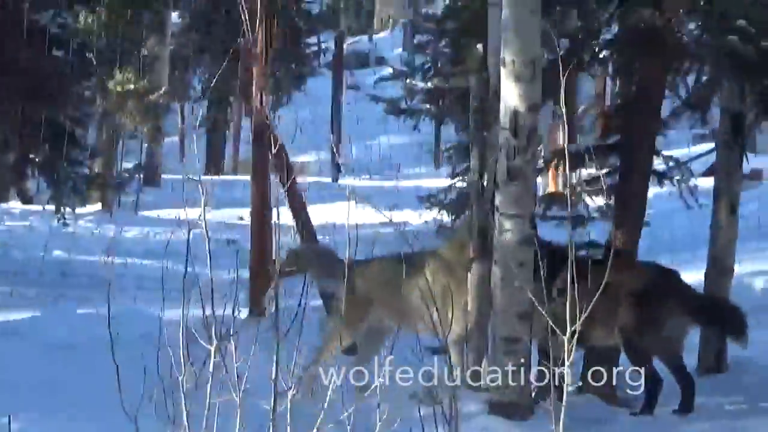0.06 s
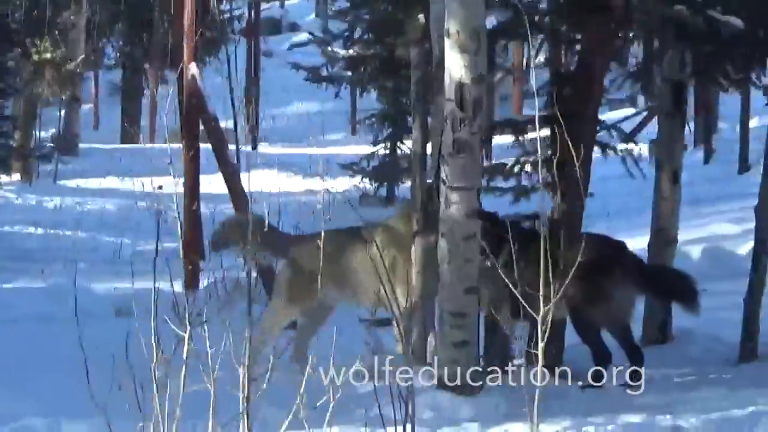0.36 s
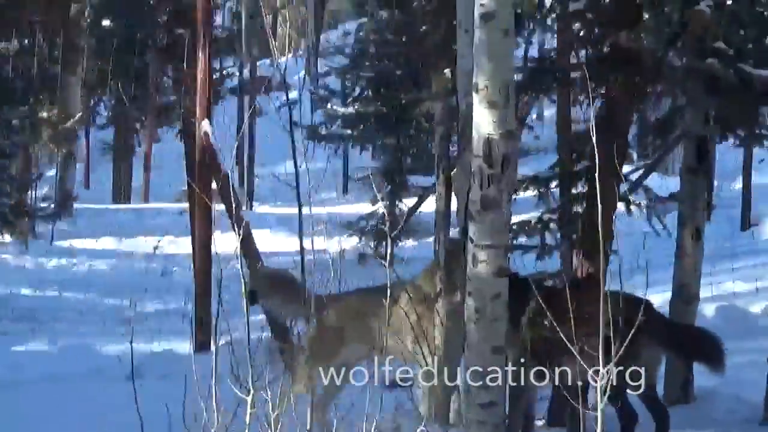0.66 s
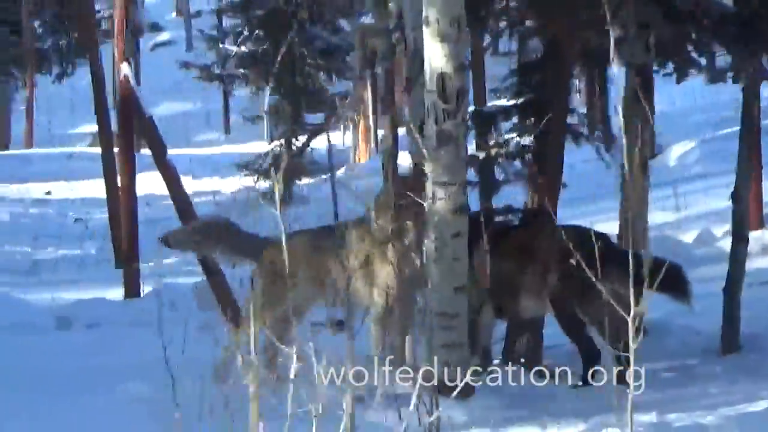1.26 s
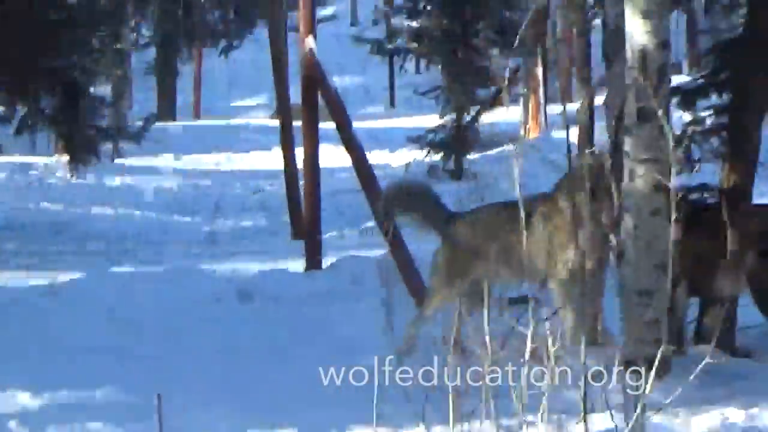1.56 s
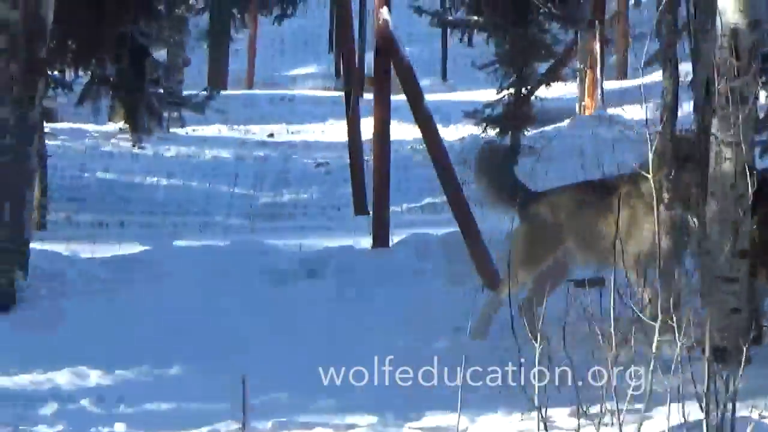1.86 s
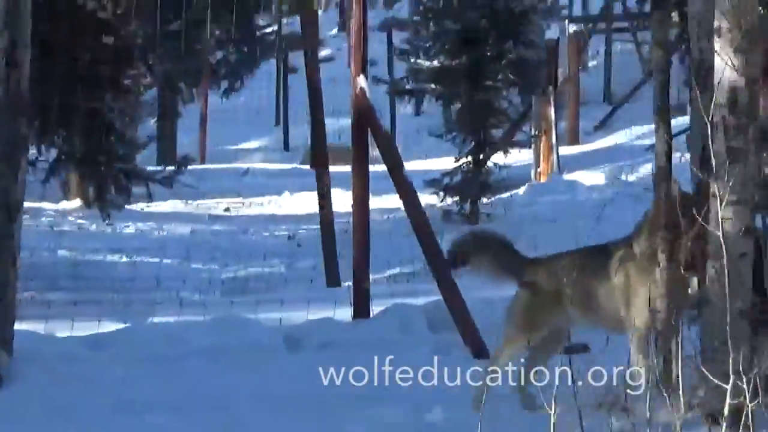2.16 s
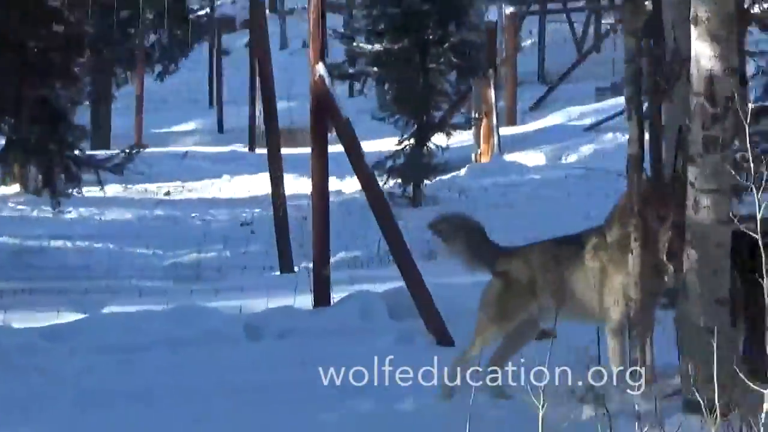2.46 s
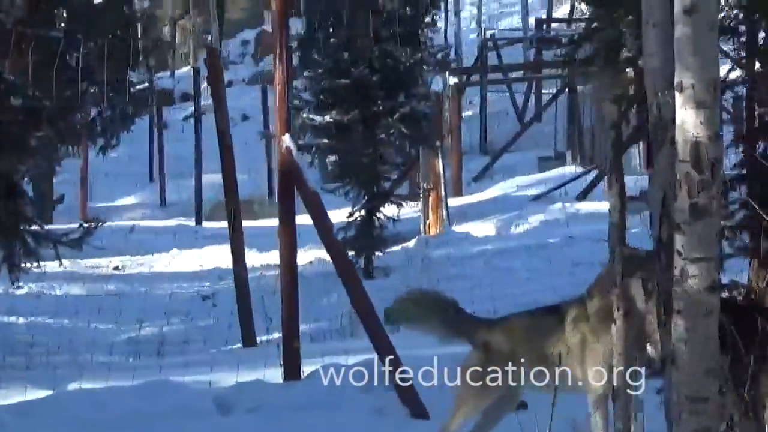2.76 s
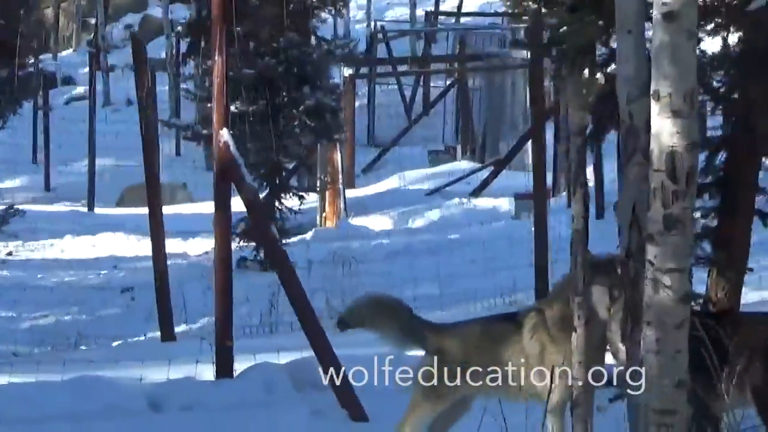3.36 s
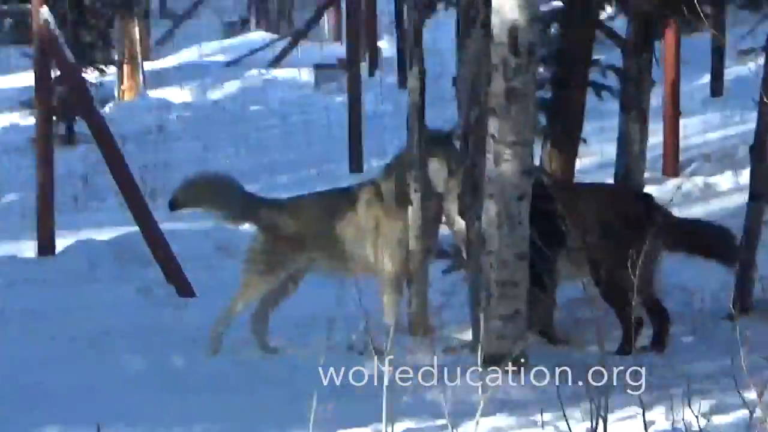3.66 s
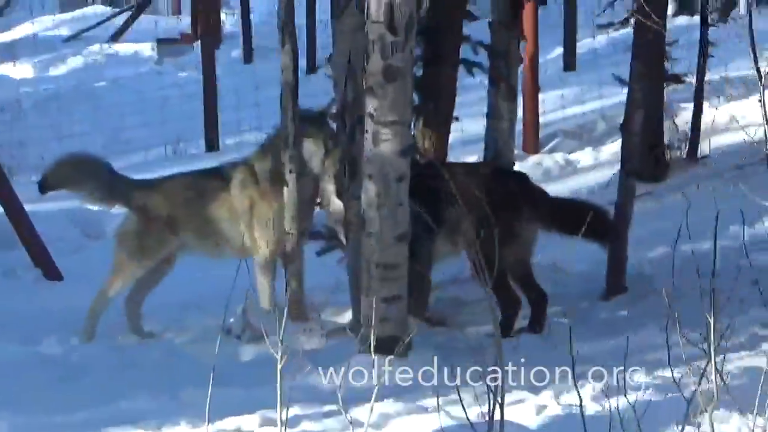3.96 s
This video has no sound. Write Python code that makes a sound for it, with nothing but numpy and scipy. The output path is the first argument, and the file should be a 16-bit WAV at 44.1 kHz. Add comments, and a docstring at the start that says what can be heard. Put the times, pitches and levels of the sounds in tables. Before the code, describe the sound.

Boots press slowly into cold snow, each close step creaking into a crunch with a small squeak. Trouser legs swish and soles scuff in between, over a faint woodland rustle, while low bumps on the microphone build late on.

```python
"""Slow steps on cold snow

A quiet wood, the microphone close to the walker's boots. Each boot loads the dry snow in single
creaking slips that crowd into a crunch and end in a squeak; now and then the icy crust snaps.
Between steps the legs swish past and the soles scuff; a low rumble grows on the microphone."""
import sys
import numpy as np
from scipy.fft import rfft, irfft, next_fast_len
from scipy.io import wavfile
from scipy.ndimage import map_coordinates

SR = 44100
rng = np.random.default_rng(int(sys.argv[2]) if len(sys.argv) > 2 else 0)


def unload_wav(signal):
    """Save mono or channel-first audio to the path in sys.argv[1] as 16-bit WAV at rate SR, clipped to [-1, 1]."""
    wavfile.write(
        sys.argv[1],
        SR,
        np.round(np.clip(np.atleast_2d(signal).T, -1, 1) * 32767).astype(np.int16),
    )


N = 176400

# faint rustle of the wood, all around (frequency [Hz], gain [dB])
RUSTLE_COLOUR = [(25, -19), (90, -56), (250, 5.5), (650, 1.5), (1300, -3), (2000, -6.5), (3800, -8),
                 (5800, -8), (7700, -12.5), (10000, -6.5), (11000, -8.5)]
# the walker holds still and the background drops (start [s], end [s])
PAUSES = [(0.196, 0.28), (1.825, 1.905)]
# buffeting on the microphone (time [s], level [dB])
RUMBLE_LEVELS = [(0, -55.5), (.5, -53), (.7, -43.5), (.83, -37), (.9, -62), (1.401, -65), (2.08, -66),
                 (2.18, -51), (2.621, -60), (2.92, -39), (3.301, -47), (3.55, -29.5), (3.75, -39.5),
                 (4, -34)]
# its spectrum (frequency [Hz], gain [dB])
RUMBLE_COLOUR = [(20, -22), (50, 2), (100, -3), (150, -4.5), (230, -12), (400, -23), (1500, -41)]
# how hard the snow crunches, one list a step (time [s], relative level [dB], grain pitch [Hz])
STEP_CRUNCHES = [
    [(0.0, -38.5, 1070), (0.138, -33, 950), (0.16, -40.5, 860)],
    [(0.735, -26.5, 1200), (0.809, -23, 990), (0.85, -53, 788)],
    [(1.27, -46, 770), (1.468, -30.5, 1440), (1.51, -52, 720)],
    [(1.975, -47.5, 780), (2.157, -22.5, 1240), (2.205, -35.5, 750)],
    [(2.68, -66, 809), (2.796, -27.5, 1070), (2.89, -39.5, 694)],
    [(3.32, -43, 1080), (3.416, -24, 1440), (3.6, -38.5, 647)],
]
# how the snow pack colours its breaking grains (frequency [Hz], gain [dB])
SNOW_PACK_COLOUR = [(80, -53), (170, -0.5), (280, -0.5), (600, 3.5), (900, 1), (1400, 0.5), (2000, 3.5),
                    (2700, 1.5), (3800, -3), (8000, -26)]
# fine fizz on top of a crunch (frequency [Hz], gain [dB])
FIZZ_COLOUR = [(1500, -21), (2600, 5), (4000, 5.5), (5500, 4.5), (6600, 5), (7800, -2), (9400, 5.5),
               (11000, 4.5)]
# single slips of snow under the sole (time [s], relative level [dB], pitch [Hz], width [ms])
SNOW_SLIPS = [(0.0217, -27, 880, 1.6), (0.0382, -22, 1160, 2.1), (0.0728, -25, 860, 2.3),
              (0.2597, -28.0, 650, 4.3), (0.363, -26.5, 740, 6), (0.5881, -26.0, 760, 3.5),
              (0.7431, -12.5, 840, 0.86), (0.7752, -18, 710, 2.3), (0.8125, -18, 640, 2.7),
              (0.8349, -18, 1420, 0.65), (0.8647, -24.5, 1213, 0.82), (1.1109, -16, 690, 0.54),
              (1.2052, -19, 584, 1), (1.247, -22.5, 790, 0.53), (1.2588, -17, 920, 0.6),
              (1.2649, -21.5, 1030, 1.4), (1.283, -25.5, 660, 1.6), (1.324, -26, 890, 1.0),
              (1.331, -19.5, 1080, 0.82), (1.4623, -20, 684, 2.1), (1.4936, -21, 630, 1),
              (1.51, -24.0, 570, 2), (1.5318, -18.5, 670, 1.2), (1.5559, -20.5, 660, 1.1),
              (1.565, -21.5, 695, 3.1), (1.5756, -16.5, 580, 2.5), (1.6003, -17.5, 670, 2.6),
              (1.6079, -19, 770, 2), (1.6293, -16, 780, 0.89), (1.6526, -21.5, 845, 3.2),
              (1.7981, -19.5, 720, 1.35), (1.9132, -16.0, 1070, 0.85), (1.9826, -19.5, 795, 3.3),
              (1.9871, -16, 720, 2.8), (2.0076, -18.0, 850, 1.4), (2.0345, -15.5, 1220, 1.4),
              (2.0641, -18.5, 870, 3.4), (2.1332, -12.5, 742, 1.1), (2.1416, -23, 844, 2.3),
              (2.1914, -14, 656, 3.9), (2.2273, -19, 850, 1.0), (2.4299, -31.5, 620, 2.1),
              (2.47, -29, 840, 2.3), (2.5154, -23, 860, 1.4), (2.5637, -14.5, 690, 1.76),
              (2.6045, -14.5, 684, 1.15), (2.634, -14, 676, 0.81), (2.6573, -19, 1030, 1.0),
              (2.6675, -12.5, 730, 0.62), (2.6904, -17, 808, 1), (2.704, -17, 910, 0.4),
              (2.7156, -17.5, 720, 1.9), (2.7368, -25.5, 1180, 7.3), (2.7467, -20.5, 840, 2.0),
              (2.7574, -14.5, 1100, 0.55), (2.7639, -15, 1000, 0.85), (2.821, -18.5, 670, 3.2),
              (2.8665, -24.5, 677, 4.9), (2.8797, -18.5, 700, 2.2), (2.9017, -18.5, 720, 2.1),
              (2.936, -16.5, 673, 1.76), (3.076, -20, 802, 1.13), (3.1218, -18.5, 775, 3.3),
              (3.2225, -21, 970, 1.8), (3.2695, -24.5, 920, 1.3), (3.2864, -15.5, 970, 1.5),
              (3.3132, -24, 1000, 2), (3.3316, -20.5, 980, 1.9), (3.342, -23.0, 1205, 3),
              (3.3536, -11, 1250, 0.8), (3.3642, -20.0, 1167, 3.8), (3.4683, -11.5, 1350, 1.3),
              (3.5125, -11.0, 645, 1.7), (3.5602, -20.5, 600, 2.8), (3.581, -21, 610, 2.2),
              (3.5893, -17.5, 630, 2), (3.6347, -19, 632, 3.2), (3.6808, -16, 610, 3.1),
              (3.7371, -22, 790, 1.9), (3.7734, -16.5, 597, 2.9), (3.8272, -15, 715, 2.6),
              (3.8607, -19.5, 810, 1.4), (3.9079, -17, 810, 3.2), (3.9913, -14.5, 690, 3.6)]
# puff of hiss around a slip (frequency [Hz], gain [dB])
PUFF_COLOUR = [(120, 1), (300, 19), (1200, 16), (2200, 0.5), (3800, -2.5), (6000, -0.5), (7800, -7),
               (10500, -1.5)]
# slips locking into a squeak (start [s], length [s], start pitch [Hz], end pitch [Hz], level [dB])
SNOW_SQUEAKS = [(0.075, 0.038, 2000, 2350, -34), (0.919, .14, 1849, 2350, -47),
                (1.418, 0.046, 1500, 2042, -27), (2.089, .035, 1754, 1500, -24),
                (2.157, 0.044, 1200, 1112, -23), (2.29, .13, 1300, 1833, -48.5),
                (2.763, 0.079, 1450, 2092, -30), (3.376, 0.084, 1350, 1706, -24.5)]
# legs passing each other
# (start [s], length [s], level [dB], zip relative to hiss [dB], start pitch [Hz], end pitch [Hz])
LEG_SWISHES = [(.25, 0.11, -38.5, -10, 2026, 3500), (0.371, 0.11, -29.5, -9.5, 4700, 6660),
               (0.852, 0.22, -39, -25, 4000, 6070), (1.704, 0.086, -38, -7.5, 3800, 6200),
               (2.267, 0.24, -40, -20, 4420, 5800), (2.988, 0.075, -33.5, -8, 3700, 6200),
               (3.062, 0.11, -34, -13.5, 4530, 6500), (3.726, 0.14, -38, -18, 5380, 6500),
               (3.82, 0.15, -38.5, -17, 5130, 5600)]
# hiss of cloth on cloth (frequency [Hz], gain [dB])
CLOTH_COLOUR = [(100, -0.5), (250, -1.5), (600, -3.5), (900, 2.5), (1300, -8.5), (2000, -6.5), (3000, -4.5),
                (4200, -5.5), (5600, -3), (7700, -7.5), (9400, 0), (11000, -1.5)]
# short skids of the sole (start [s], length [s], level [dB])
SOLE_SCUFFS = [(0.506, 0.02, -34), (0.546, 0.022, -35.5), (0.584, .021, -32.5), (0.626, 0.025, -33),
               (0.658, .023, -32), (0.69, 0.1, -34.5), (1.114, 0.028, -42.5), (1.648, 0.025, -36.5),
               (1.799, 0.0091, -30), (1.916, 0.01, -35), (3.222, 0.0076, -31), (3.288, 0.0079, -29),
               (3.855, 0.0097, -34.5)]
# their rubbing noise (frequency [Hz], gain [dB])
SCUFF_COLOUR = [(80, -16), (200, 9.5), (700, 3), (1200, -1), (2500, -4), (4000, -5.5), (5800, -2.5),
                (7800, -10.5), (9500, -1.5), (11000, -4.5)]
# a boot taking weight (time [s], half length [s], level [dB], pitch [Hz])
BOOT_THUDS = [(0.59, 0.0074, -32, 212), (0.727, 0.022, -31.5, 222.3), (1.444, 0.17, -40.5, 290)]
# low knocks on the microphone (time [s], peak level [dB])
MIC_BUMPS = [(0.666, -33), (2.282, -43), (2.352, -43.5), (2.925, -30), (3.11, -33), (3.279, -29.5),
             (3.426, -27), (3.543, -21), (3.567, -25), (3.597, -29), (3.663, -26.5), (3.726, -22),
             (3.919, -23)]
# the icy crust snapping (time [s], level [dB])
CRUST_CRACKS = [(0.7405, -12), (0.8357, -26), (1.1094, -19), (1.203, -23.5), (1.266, -18), (2.8204, -18.5),
                (2.88, -24), (3.2023, -23), (3.228, -21.5), (3.269, -25), (3.4679, -14), (3.5129, -15.5)]
# spectrum of a snap (frequency [Hz], gain [dB])
CRUST_COLOUR = [(150, -8), (300, -24), (1200, -7), (2200, 14), (3800, -6), (5600, -1), (7800, -9),
                (10500, -6)]
# stereo width of the walker at the microphone (frequency [Hz], side gain [dB])
STEREO_WIDTH = [(100, -36), (500, -17.5), (1000, -16), (2000, -12.5), (4000, -11.5), (10000, -16)]


def amp(db):
    """Decibels to gain."""
    return 10 ** (np.asarray(db) / 20)


def unit(x):
    """Scaled to rms 1."""
    return x / np.sqrt(np.mean(x ** 2) + 1e-20)


def clock():
    """Time of each sample."""
    return np.arange(N) / SR


def filtered(x, gain):
    """x times a gain that depends on frequency."""
    size = next_fast_len(N + 8192)
    return irfft(rfft(x, size) * gain(np.fft.rfftfreq(size, 1 / SR)), size)[..., :N]


def coloured(x, points):
    """x shaped by (frequency [Hz], gain [dB]) points on a log axis."""
    knots_hz, db = np.transpose(points)
    return filtered(x, lambda hz: amp(np.interp(np.log(hz + 1), np.log(knots_hz + 1), db)))


def noise(points):
    """Coloured noise of rms 1."""
    return unit(coloured(rng.standard_normal(N), points))


def wobble(rate):
    """A smooth random curve, rate knots a second."""
    return map_coordinates(rng.standard_normal(N // 8), [clock() * rate], mode='wrap')


def fuzzy_tone(hz, width_hz):
    """A band of noise that follows a pitch curve."""
    phase = 2 * np.pi * np.cumsum(hz) / SR
    return unit(wobble(width_hz) * np.sin(phase) + wobble(width_hz) * np.cos(phase))


def gate(start, end, edge_s):
    """1 between start and end, with soft edges."""
    t = clock()
    return np.clip(np.minimum(t - start, end - t) / edge_s + .5, 0, 1)


def grains(per_s, pitch_hz, spread_db, scatter_octaves=0.79, decay_cycles=0.61):
    """Tiny fractures at random moments, each about one cycle long, coloured by the snow pack; rms 1."""
    count = int(per_s * N / SR)
    moment, strength, phase = rng.random((8000, 4))[:count, :3].T
    detune = np.clip(rng.standard_normal(8000)[:count], -2, 2)
    at = (moment * N).astype(int)
    hz = np.broadcast_to(pitch_hz, N)[at] * 2 ** (scatter_octaves * detune)
    offsets = np.arange(-128, 256)
    cycles = hz[:, None] * offsets / SR
    size = amp(-spread_db * np.log(1 - .95 * strength))  # many weak, few strong
    envelope = np.exp(-np.abs(cycles / (decay_cycles * np.where(offsets < 0, .5, 1))) ** 1.01)
    waves = size[:, None] * envelope * np.cos(2 * np.pi * (cycles + phase[:, None]))
    fractures = np.bincount(((at[:, None] + offsets) % N).ravel(), waves.ravel(), N)
    return unit(coloured(fractures, SNOW_PACK_COLOUR))


def wood_rustle():
    """The faint, wide background of the wood."""
    mid, side = noise(RUSTLE_COLOUR), amp(-9) * noise(RUSTLE_COLOUR)
    return amp(-46.5) * np.array([mid + side, mid - side])


def settling_snow():
    """Snow ticks softly under the standing foot."""
    return amp(-46) * grains(per_s=500, pitch_hz=1156, spread_db=4)


def mic_rumble():
    """Lumpy low buffeting on the microphone, partly different on each side."""
    times, db = np.transpose(RUMBLE_LEVELS)
    mid, side = [unit(amp(2.7 * wobble(27.75)) * noise(RUMBLE_COLOUR)) for _ in range(2)]
    side = coloured(side, [(30, -16), (70, -10), (130, -6)])
    return amp(np.interp(clock(), times, db)) * np.array([mid + side, mid - side])


def sole_chatter(load, rate_hz=134.8, jitter=.25, depth_db=4):
    """A lightly loaded sole sticks and slips in quick pulses; under full weight they merge."""
    phase = 2 * np.pi * np.cumsum(rate_hz * np.exp(jitter * wobble(rate_hz))) / SR
    depth = np.log(amp(depth_db)) / (1 + (load / amp(-26)) ** 2)
    return np.exp(depth * np.cos(phase)) / np.sqrt(np.i0(2 * depth))  # a gain of mean power 1


def snow_crunch():
    """Under full weight the snow breaks in dense grains, topped by crisper ones and a fine fizz."""
    t, load, pitch = clock(), np.zeros(N), np.full(N, 1156.)
    for step in STEP_CRUNCHES:
        times, db, hz = np.transpose(step)
        pressing = gate(times[0], times[-1], edge_s=0.0015)
        load += pressing * amp(np.interp(t, times, db))
        pitch = np.where(pressing > 0, np.interp(t, times, hz), pitch)
    fizz = (load / amp(-28.5)) ** 0.55 * amp(-35 + 2.85 * wobble(250)) * noise(FIZZ_COLOUR)
    crisp = (load / amp(-17.5)) ** 0.12 * amp(-36.5) * grains(per_s=450, pitch_hz=1900, spread_db=0.5)
    dense = load * amp(-0.5) * grains(per_s=1300, pitch_hz=pitch, spread_db=3)
    return sole_chatter(load) * (dense + crisp) + fizz


def snow_creaks(sag=0.19, snap_hz=2023, snap_s=0.00038, give_hz=302, give_s=0.006):
    """Each slip is a few cycles of sagging pitch, with a bright snap, a low give and a puff of hiss."""
    t, slips, puff_level = clock(), np.zeros(N), np.zeros(N)
    for at, db, hz, width_ms in SNOW_SLIPS:
        near = slice(max(0, int((at - .012) * SR)), int((at + .02) * SR))
        age, width, brightness = t[near] - at, width_ms / 1000, hz / 900
        # the bright edge comes just ahead of the slip's peak
        snap_level = amp(-7) * min(brightness, 1) ** 2 * np.exp(-((age + 0.47 * width) / snap_s) ** 2)
        snap_cycles = snap_hz * age * np.exp(rng.normal(0, 0.19)) + rng.random()
        snap = snap_level * np.sin(2 * np.pi * snap_cycles)
        # the pack gives way afterwards; hard slips push it little further
        after = np.maximum(age, 0)
        give_level = amp(-11.5) / max(width_ms, 1) / (1 + amp(db + 15.5))
        give_cycles = give_hz * after * np.exp(rng.normal(0, 0.093))
        give = give_level * np.exp(-after / give_s) * np.sin(2 * np.pi * give_cycles)
        flank_s = width * np.where(age < 0, 0.42, 0.9)  # quick rise, slower fall
        cycles = hz * (age - sag * width * np.log(np.cosh(age / width)))
        body = np.exp(-(age / flank_s) ** 2) * np.cos(2 * np.pi * cycles + rng.normal(0, 0.48))
        slips[near] += amp(db - 0.5) * (give - body - snap)
        puff_level[near] += amp(db - 10) * brightness ** 0.56 * np.exp(-np.abs(age) / (1.44 * width))
    return slips + puff_level * noise(PUFF_COLOUR)


def snow_squeaks():
    """Slips fall into step for a moment and make a rough gliding tone."""
    t, level, pitch = clock(), np.zeros(N), np.zeros(N)
    for start, length, start_hz, end_hz, db in SNOW_SQUEAKS:
        progress = np.clip((t - start) / length, 0, 1)
        level += amp(db) * np.sqrt(np.abs(np.sin(np.pi * progress)))
        pitch = np.where(t >= start, start_hz + (end_hz - start_hz) * progress, pitch)
    return level * unit(fuzzy_tone(pitch, width_hz=380) + fuzzy_tone(pitch, width_hz=1300))


def leg_swishes():
    """Hiss swells as a leg swings past the microphone, with a rising zip of cloth on cloth."""
    t = clock()
    level, pitch, zip_level = np.zeros((3, N))
    for start, length, db, zip_db, start_hz, end_hz in LEG_SWISHES:
        progress = (t - start) / length
        swell_db = np.interp(progress, [0, 0.64, 1], [-8.5, 0, -2])
        swell = amp(db + swell_db) * gate(start, start + length, edge_s=0.022)
        loudest = swell > level
        pitch = np.where(loudest, start_hz + (end_hz - start_hz) * progress, pitch)
        zip_level = np.where(loudest, amp(zip_db), zip_level)
        level = np.maximum(level, swell)
    zip_tone = fuzzy_tone(pitch, width_hz=1100) + amp(-0.5) * fuzzy_tone(1.8 * pitch, width_hz=2200)
    return level * amp(3.4 * wobble(120)) * (noise(CLOTH_COLOUR) + zip_level * zip_tone)


def sole_scuffs():
    """The sole skids in short, abrupt bursts, gritty with crushed crystals."""
    level = sum(amp(db) * gate(start, start + length, edge_s=0.0031) for start, length, db in SOLE_SCUFFS)
    grit = amp(-8) * grains(per_s=1700, pitch_hz=1840, spread_db=15.5)
    return level * amp(3 * wobble(300)) * (noise(SCUFF_COLOUR) + grit)


def boot_thuds():
    """Soft low pushes as a boot lands."""
    t = clock()
    return sum(amp(db) * np.exp(-((t - at) / half_s) ** 2) * fuzzy_tone(np.full(N, hz), width_hz=170)
               for at, half_s, db, hz in BOOT_THUDS)


def mic_bumps(pitch_hz=98.3, half_s=0.0095):
    """Each knock on the microphone is a couple of low cycles, a little out of step between the sides."""
    t, knocks = clock(), np.zeros((2, N))
    for at, db in MIC_BUMPS:
        phase = 2 * np.pi * rng.random() + rng.normal(0, 0.98, (2, 1))
        envelope = amp(db) * np.exp(-((t - at) / half_s) ** 2)
        knocks += envelope * np.cos(2 * np.pi * pitch_hz * (t - at) + phase)
    return knocks


def crust_cracks(decay_s=0.00081):
    """The icy crust snaps in sudden broad bursts of noise."""
    t = clock()
    level = sum(amp(db) * np.exp(-np.abs(t - at) / np.where(t < at, decay_s / 5, decay_s))
                for at, db in CRUST_CRACKS)
    return level * noise(CRUST_COLOUR)


def spread(x):
    """Each fracture reaches the microphone from a slightly different direction."""
    side = coloured(x * unit(wobble(400)), STEREO_WIDTH)
    return np.array([x + side, x - side])


def scene():
    """Boots and clothing up close, rumble on the microphone, the wood faint behind."""
    settling, rustle = settling_snow(), wood_rustle()
    pause_dip = amp(-3 * sum(gate(start, end, edge_s=0.0067) for start, end in PAUSES))
    snow = snow_creaks() + crust_cracks() + snow_crunch() + snow_squeaks() + pause_dip * settling
    walker = spread(snow + leg_swishes() + sole_scuffs() + boot_thuds())
    return walker + mic_bumps() + mic_rumble() + pause_dip * rustle


def record(dry):
    """The recorder keeps nothing above its band limit."""
    top_hz = 11050
    return filtered(dry, lambda hz: 1 / np.sqrt(1 + (hz / top_hz) ** 260))


dry = scene()
out = record(dry)
unload_wav(out)
```